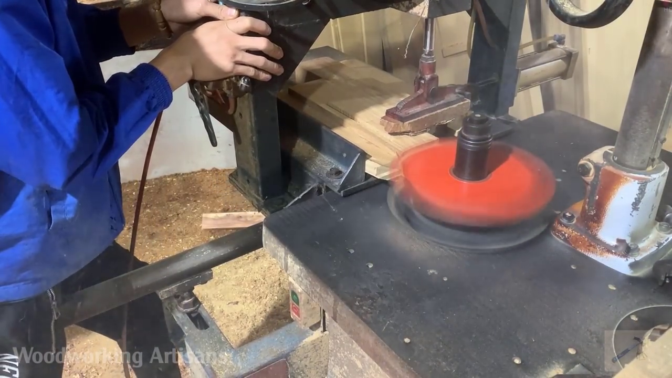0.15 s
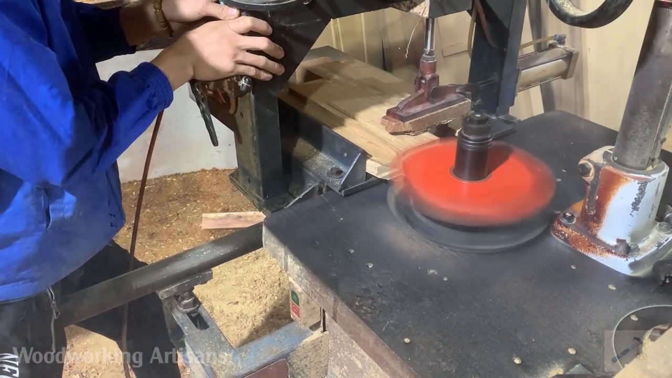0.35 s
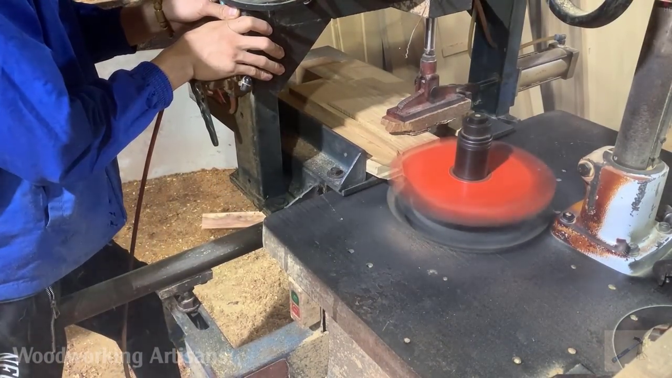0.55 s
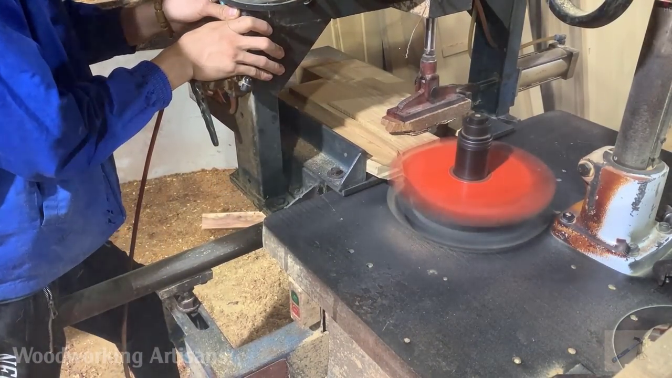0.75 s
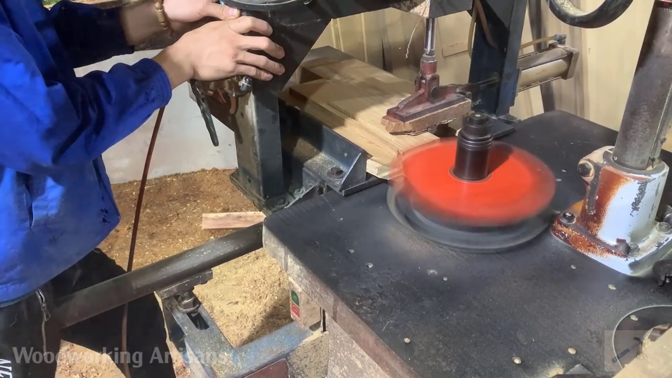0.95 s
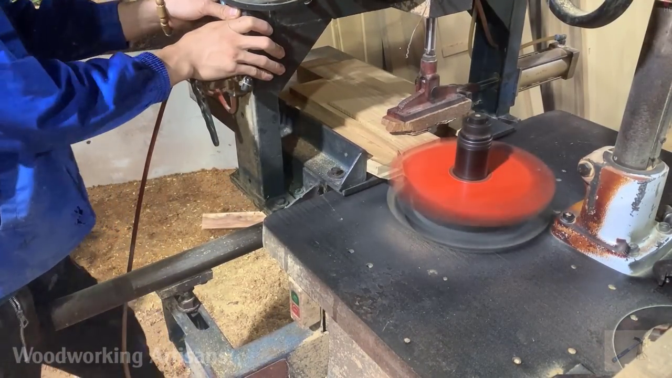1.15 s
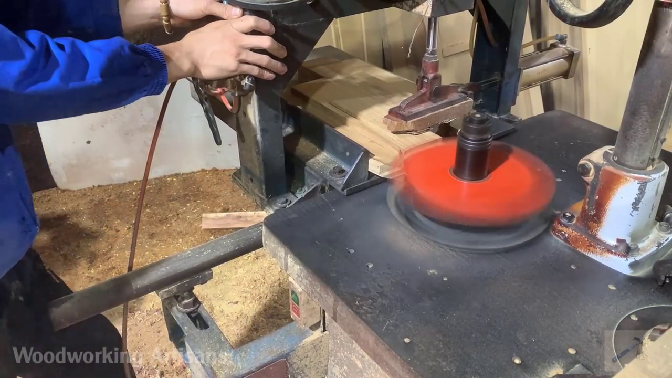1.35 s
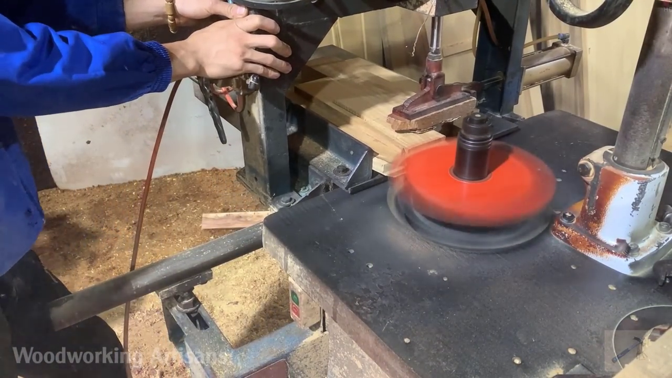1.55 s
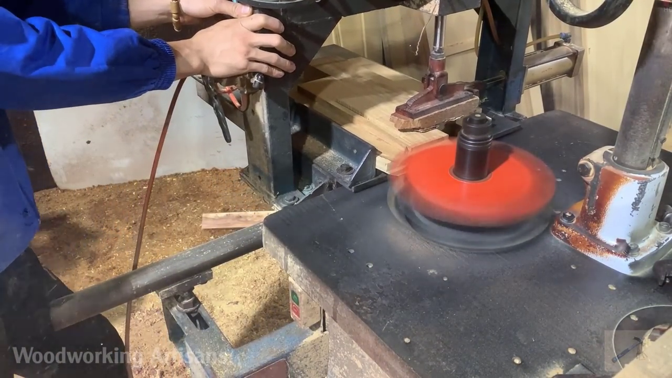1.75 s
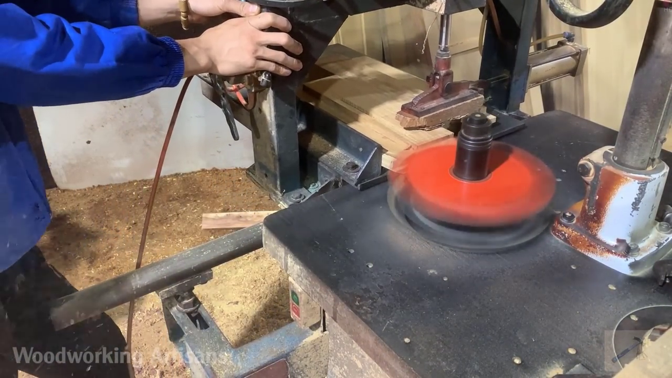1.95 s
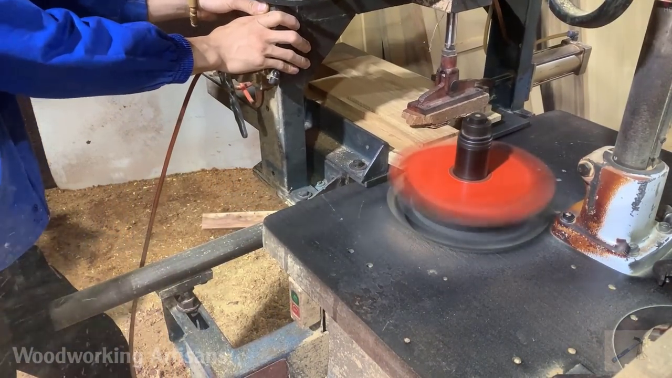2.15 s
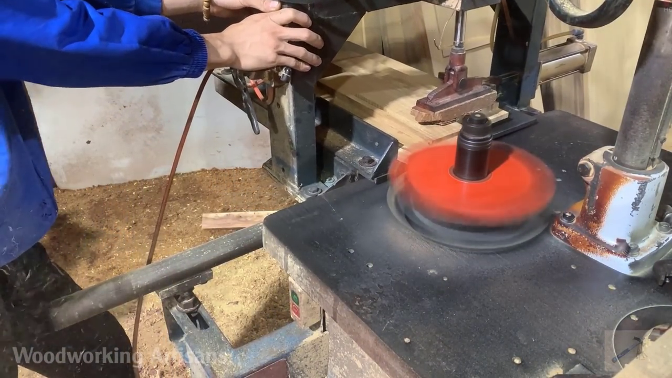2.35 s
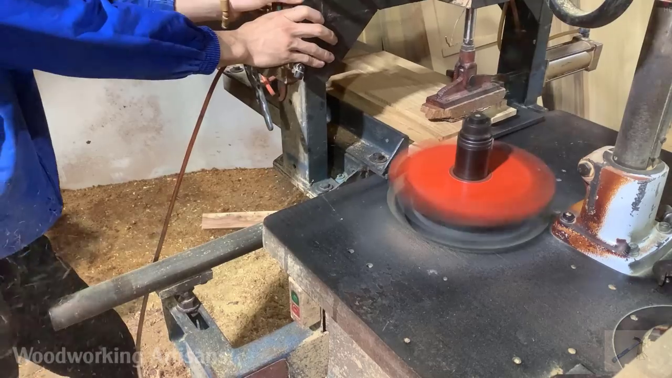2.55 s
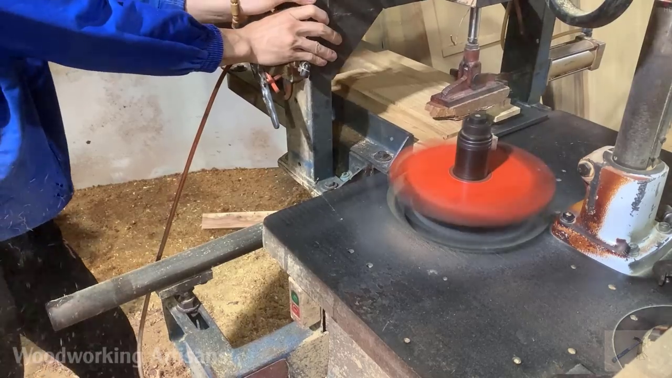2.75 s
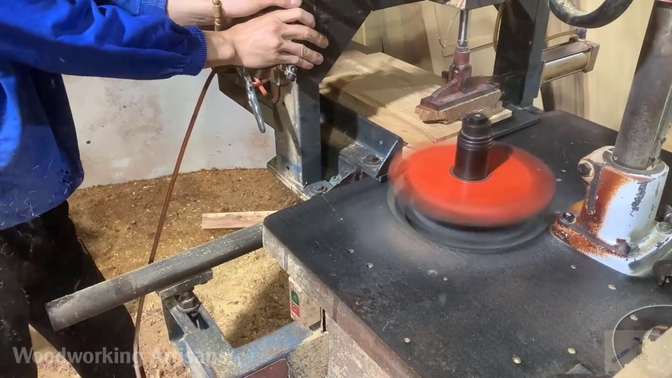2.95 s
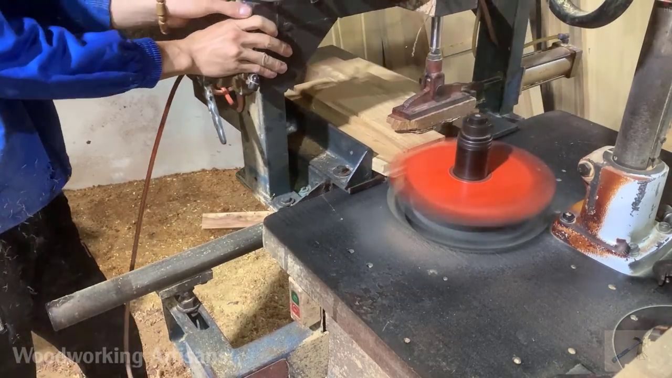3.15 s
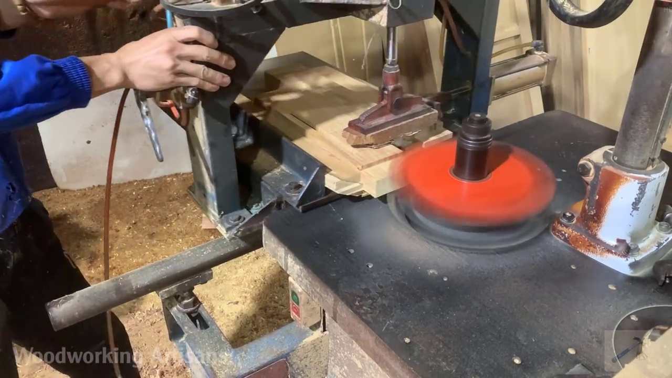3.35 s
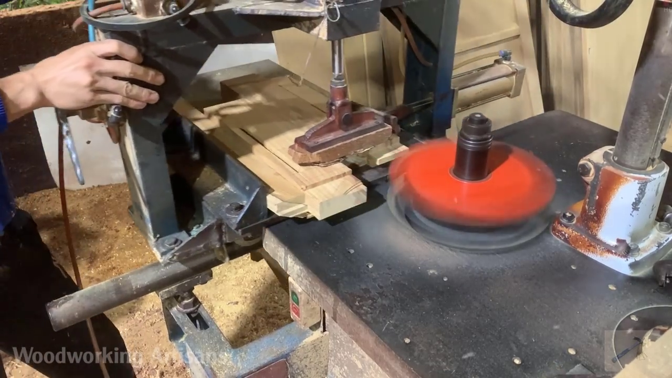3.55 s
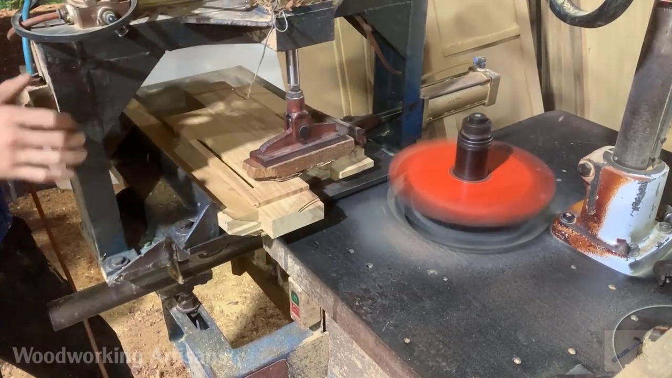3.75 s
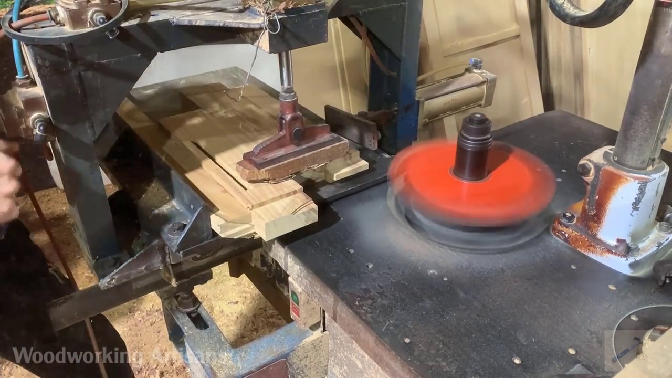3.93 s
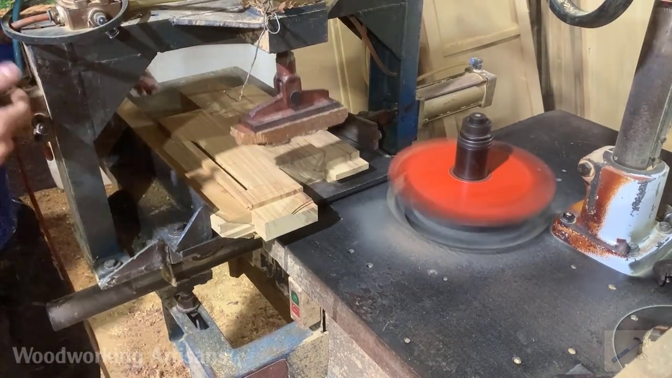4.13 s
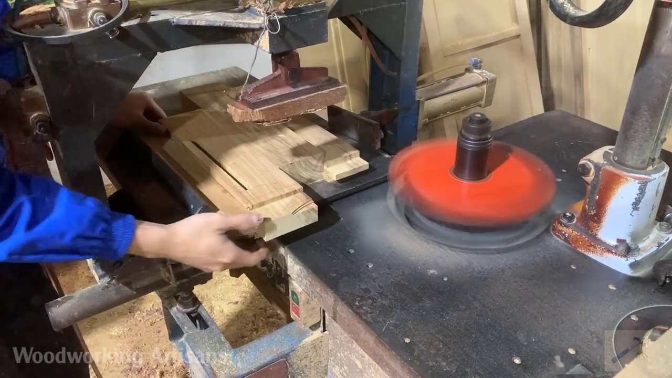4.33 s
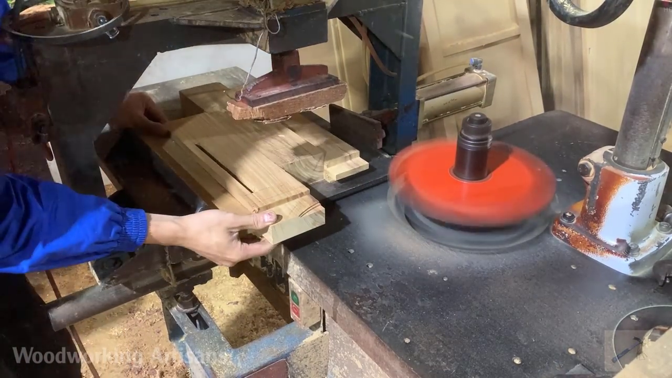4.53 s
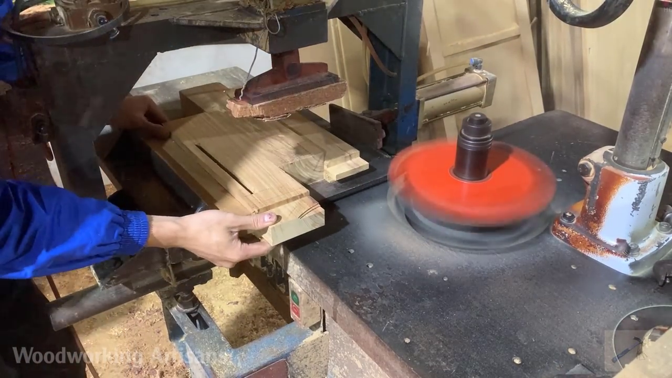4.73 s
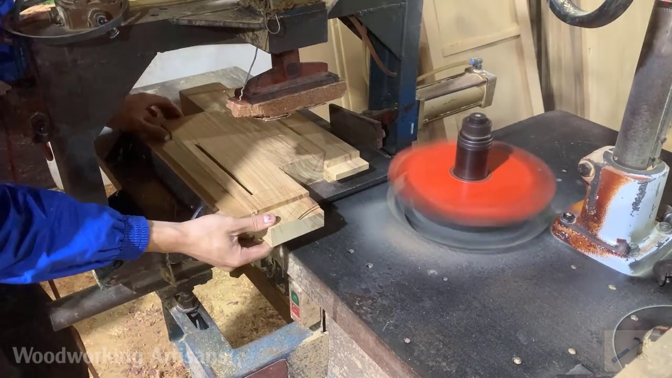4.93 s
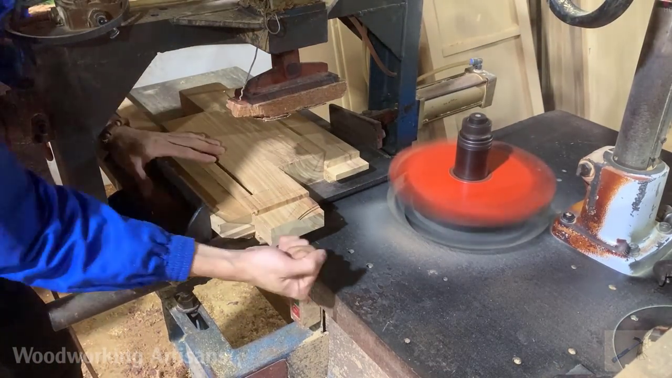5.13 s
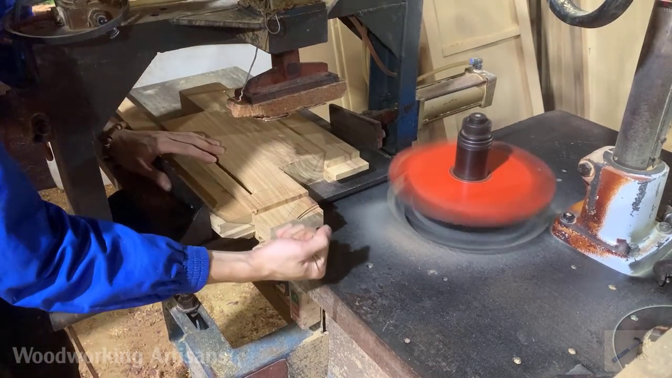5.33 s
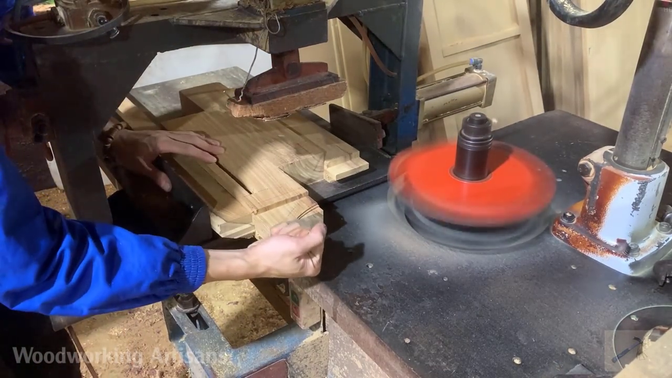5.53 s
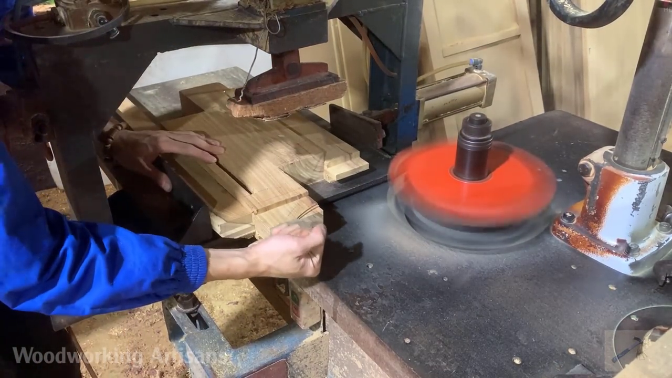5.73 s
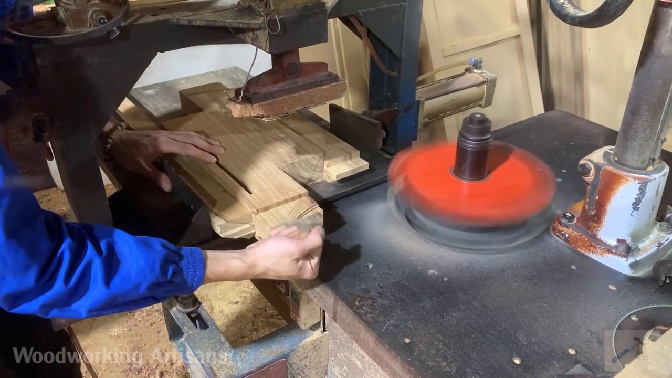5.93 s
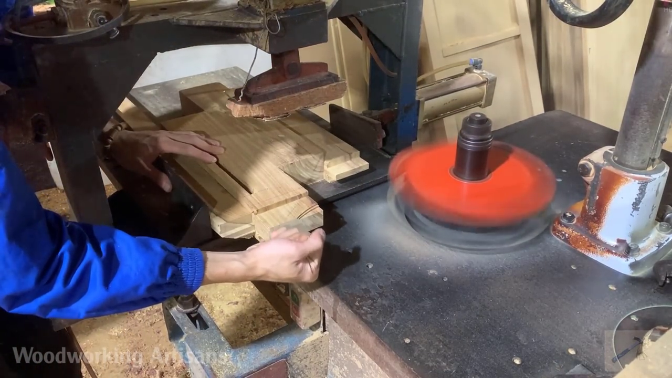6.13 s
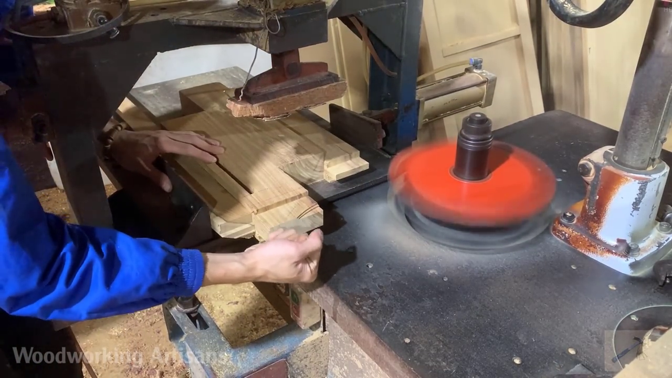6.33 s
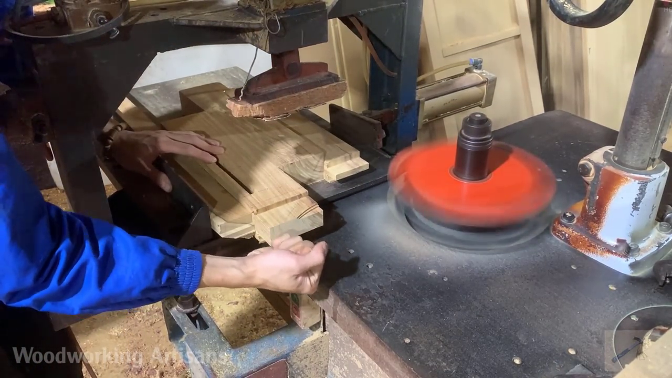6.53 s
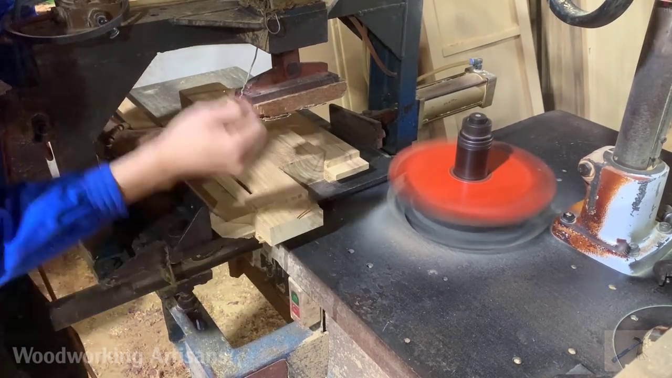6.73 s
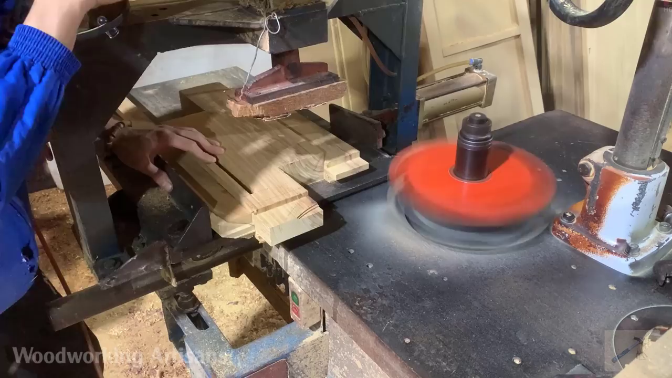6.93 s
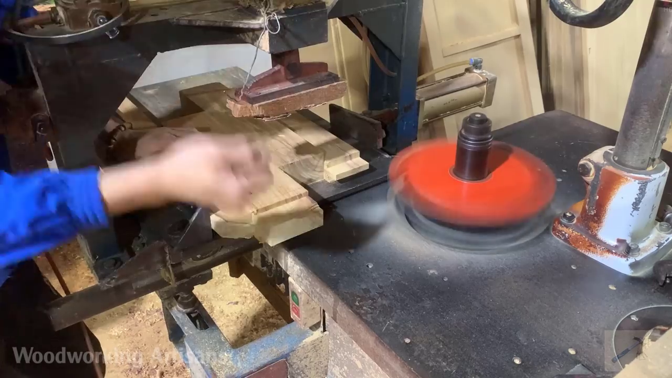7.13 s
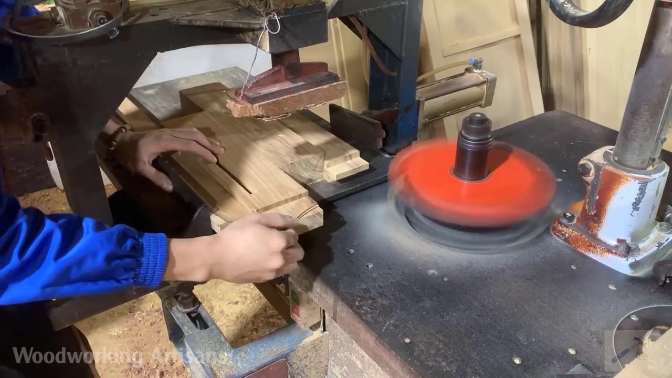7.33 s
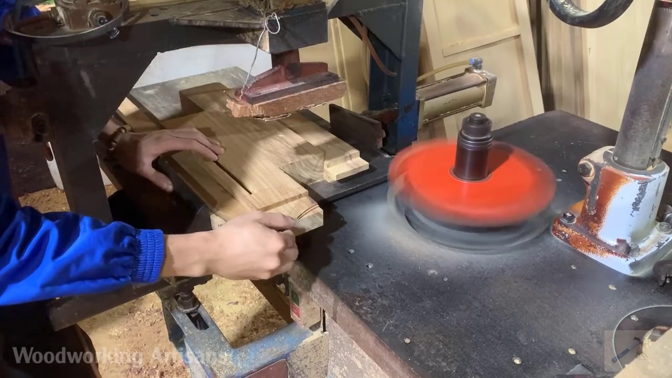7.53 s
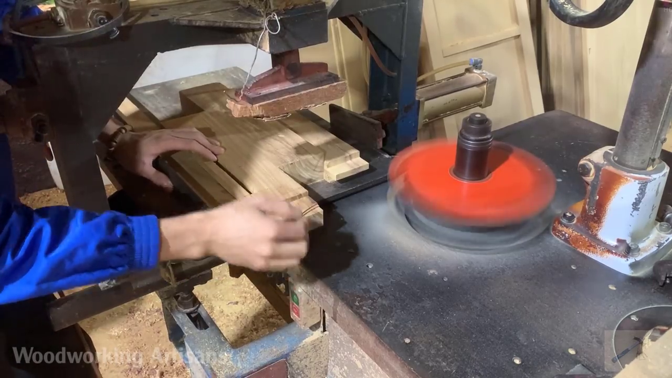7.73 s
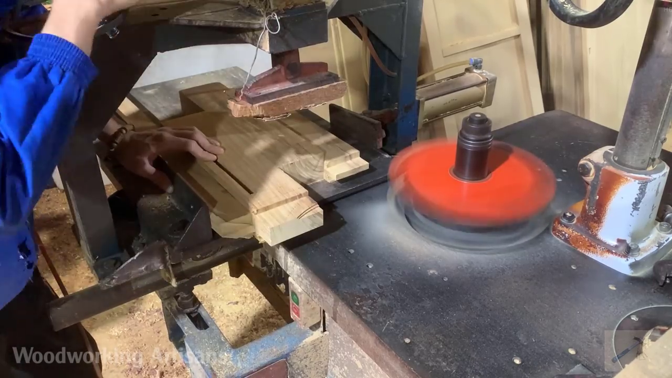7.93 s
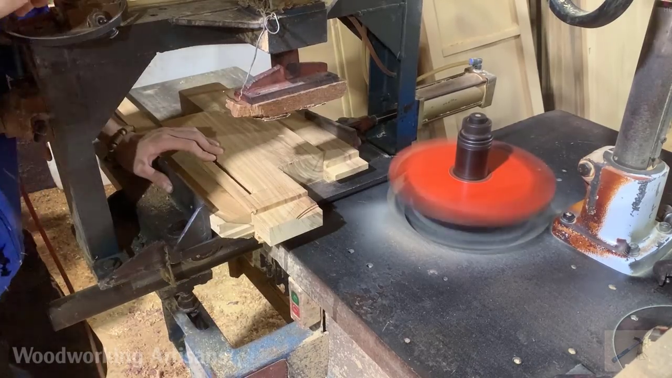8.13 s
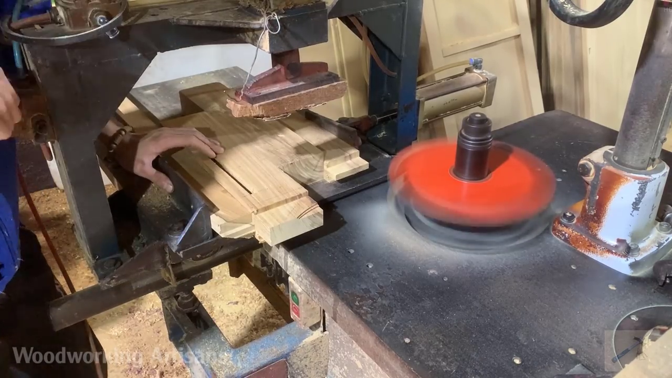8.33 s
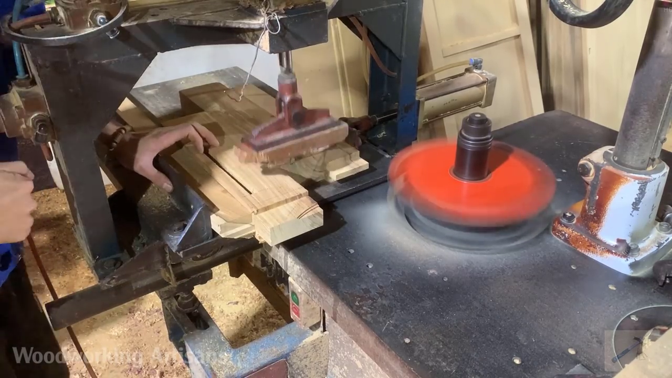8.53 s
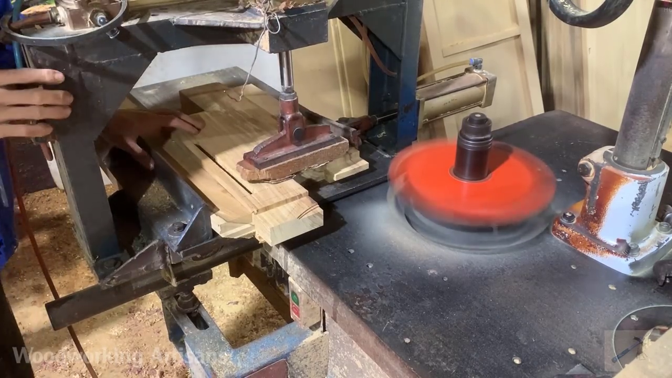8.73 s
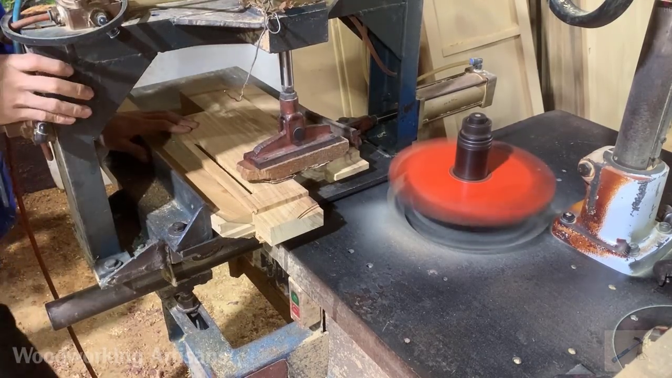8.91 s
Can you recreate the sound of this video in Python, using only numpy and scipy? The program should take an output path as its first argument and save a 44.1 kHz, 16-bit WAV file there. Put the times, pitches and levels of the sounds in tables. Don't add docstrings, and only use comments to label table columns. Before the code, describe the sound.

A woodworking cutter screams through a clamped board in two harsh bites, then workshop hum, air clamp hisses, a loud knock and a sharp vent.

```python
import sys
import numpy as np
from scipy import signal
from scipy.fft import irfft
from scipy.io import wavfile
from scipy.ndimage import uniform_filter1d

SR = 44100
rng = np.random.default_rng(int(sys.argv[2]) if len(sys.argv) > 2 else 0)


def decibels_to_gain(level_db):
    exponent = np.asarray(level_db, float) / 20
    return 10 ** exponent


def pcm_store(signal):
    levels = np.round(np.clip(np.atleast_2d(signal), -1, 1) * 32767)
    wavfile.write(sys.argv[1], SR, levels.astype(np.int16).T)


N = 399987
TIME = np.arange(N) / SR
STEP = 64
SLOW = np.arange(N // STEP + 2) * STEP / SR
CUT_ENDS_S, SHOVE_EDGE_S = 3.68, 0.0086

# multiple of speed, level/dB
# rms, left lead/rad, gain on the second bite/dB, share of the family swell
SHAFT_ORDERS = [ (3, -60, 0, -6, 0), (8, -43, -.1, 0, 1), (16, -48, .2, 0, 1), (22, -57, .5, -3, 0),
                (23, -55, .5, -2, 0), (24, -53, -.1, -3, .3), (26, -57, .3, -3, 0), (30, -51, -.3, 2, 1),
                (31, -60, -.3, 6, .4), (32, -36.5, -1.2, 0, .47), (34, -49, -1, 0, .7),
                (36, -53, -1.2, -4, .5), (37, -53.5, -.4, 7, .7), (38, -31, .1, 0, 1), (39, -57, .1, 5, .9),
                (40, -39.5, -.1, 6, .75), (42, -65, 0, -9, .8), (45, -57, 0, 9, .6), (46, -52, .4, 12, 1),
                (47, -64, .4, 9, .8), (48, -54, .8, 12, .6), (54, -58, 1.4, 9, .7),
                (68, -65, .8, 17, 1.4), (69, -59, -.1, 6, 1.4), (70, -61, .4, 6, 1.4), (74, -49, -.4, 0, 1),
              (78, -50, -.7, -6, 1), (82, -48, .2, 0, 1), (86, -51, -.7, -8, 1), (87, -62, -.7, -7, 1),
              (88, -41.5, -.7, 3, .8), (94, -43, 1, -1, 1), (95, -65, 1, -8, .3), (96, -48.5, 1.2, 0, 1),
              (102, -46, 2.8, 2, .95)]
FAMILY_TOPS = [12, 28, 72, 87]
# f/Hz, left-right level/dB
CUTTER_LEANING = [(900, -2), (1800, 4.5), (2650, -1.5), (4200, 4), (4430, -1.5), (9500, -2), (9750, -11),
                  (11300, -12)]
# start t/s, length/s, lower level/dB, upper level/dB, swell/dB
SQUEAKS = [
    (0.052, 0.42, -48.5, -49.5, 16),
    (0.93, 0.16, -54, -63, 11),
    (1.475, 0.12, -44, -48.5, -2),
]
SQUEAK_MULTIPLES = [93, 109]
# f/Hz, level/dB per Hz
SHAVINGS = [(1500, -36), (3000, 18.5), (5000, -3), (7500, 9), (9500, 10), (12000, -1), (13500, -18),
            (15500, 3)]


def cutter():
    size, families = int(CUT_ENDS_S * SR), swells()
    turn = spindle_angle(size)
    engaged = np.clip((CUT_ENDS_S - TIME[:size]) / 0.22, 0, 1)
    second = np.clip((SLOW - 1.7) / .3, 0, 1) - .65
    flutter = drift(60.0)
    chatter_db = 2.5 * held(2.37, 0.375, 0) * (1 + np.sin(2 * np.pi * 16.8 * SLOW))
    out = np.zeros((2, size))
    for multiple, level_db, lead, second_db, share in SHAFT_ORDERS:
        bite_db = share * families[np.searchsorted(FAMILY_TOPS, multiple)] + second_db * second
        grain_db = (.2 + .01 * multiple) * drift(5.0) + .12 * flutter
        if 45 <= multiple <= 70:
            grain_db = grain_db - 9 * held(2.47 + .005 * (multiple - 46), .7, 0)
        if multiple == 32:
            grain_db = grain_db + chatter_db
        wander = fine(0.0014 * multiple * drift(5.2), size)
        phase = multiple * turn + rng.uniform(0, 2 * np.pi) + wander
        gain = fine(np.sqrt(2) * decibels_to_gain(level_db + bite_db + grain_db), size)
        pair = tone_pair(phase, lead / 2, -lead / 2) * gain
        out += panned(pair, at_hz(CUTTER_LEANING, multiple * SPEED[-1][1]))
    torn_entry_db = 7.2 * held(1.68, 0.216, 0)
    for low, high, bite_db in zip([1] + FAMILY_TOPS, FAMILY_TOPS + [140], families):
        comb = faint_comb(turn + fine(.003 * drift(20.0), size), low, high)
        comb_db = .55 * bite_db - 1 + (high < 80) * torn_entry_db + 2.0 * drift(6.0)
        out += comb * fine(decibels_to_gain(comb_db), size)
    for k, multiple in enumerate(SQUEAK_MULTIPLES):
        rub = sum(decibels_to_gain(row[2 + k]) * held(row[0], row[1], row[4]) for row in SQUEAKS)
        squeak = np.sqrt(2) * np.sin(multiple * turn + fine(.5 * drift(20.0), size))
        out += panned(squeak * fine(rub, size), pan_db=-6.0)
    bursts = 1 + .4 * np.sin(turn) + .4 * np.sin(2 * turn)
    shavings = banded_noise(SHAVINGS, low_hz=1900, patchy_db=1.5, near=.3, size=size) * bursts
    shavings_db = -44.5 + 0.5 * uniform_filter1d(families[-1], size=60)
    out += panned(shavings * fine(decibels_to_gain(shavings_db), size), pan_db=2.0)
    return np.pad(out * engaged, ((0, 0), (0, N - size)))


# t/s, knife-pass level/dB, sharpness of the blow/dB
CONTACT = [(0, -3.5, 4.5), (1.05, 2, 0.5), (1.55, 0, -4.5), (1.9, 4, -7.5), (2.28, -2, -1.5),
           (2.42, -7, -10), (2.56, -6.5, 7.5), (2.95, -5.5, 6.5), (3.1, -6, -3), (3.2, 6, -8),
           (3.36, -4, 16.5), (3.48, -3.5, 4), (3.62, -5, -5)]
# t/s, level/dB
BITE = [(0, -20), (.25, -12), (.4, -15), (.7, -4), (1.07, 9), (1.32, 2.5), (1.51, -15), (1.54, -21),
        (1.68, -21.5), (1.8, -10.5), (1.92, -13.5), (2.1, 5.5), (2.2, 5), (2.6, 0.5), (2.9, -7),
        (3.15, -22), (3.3, -22), (3.38, -25)]
# start t/s, length/s, shaving level/dB, knife-edge level/dB, edge swell/dB
SHOVES = [(0, 0.081, -3.5, -10, -11), (0.09, 0.37, -4, -14, 9), (0.467, 0.58, 4.5, 0.5, 15.5),
          (1.054, 0.13, -3.5, -11, -11), (1.2, 0.089, -5, -10, 0), (1.302, .13, -2, -12, 0),
          (1.458, 0.077, -3, -4, 9), (1.56, .11, -19, -12, 0), (1.675, 0.33, -3.5, -5.5, 4),
          (2.052, 0.14, 2, 3, -9), (2.223, 0.11, 2.5, -8, -8), (2.345, 0.059, 4.5, -5, 5),
          (2.422, .05, 3, -13, 6), (2.495, .04, 2, -14, 0), (2.545, 0.035, 3, -1, 2),
          (2.602, 0.067, 0, -1.5, 6), (2.698, 0.059, -2, -1.5, -2), (2.77, .035, -1.5, -15, 0),
          (2.824, 0.065, 0, -10, -2), (2.852, .13, -24, -2, -4), (2.987, 0.14, -14, -13.5, -2),
          (3.168, .1, -1.5, -8, 4), (3.268, 0.14, -11, -3, 0)]


def swells():
    pass_db, sharp_db = in_time(CONTACT)
    shaving = sum(decibels_to_gain(db) * held(s, length, swell / 4) for s, length, db, _, swell in SHOVES)
    edge = sum(decibels_to_gain(db) * held(s, length, swell) for s, length, _, db, swell in SHOVES)
    families = [pass_db, pass_db + sharp_db, in_time(BITE)[0]]
    r = np.exp(-STEP / SR / 0.02)
    for drive, rest_db in ((shaving, -26), (edge, -23)):
        ringing = np.maximum(drive, signal.lfilter([1 - r], [1, -r], drive))
        ringing = ringing * decibels_to_gain(1.1 * drift(8.6))
        families.append(20 * np.log10(np.hypot(ringing, decibels_to_gain(rest_db))))
    return families


# t/s, speed/turns per s
SPEED = [(0, 110.53), (.42, 110.54), (.7, 110.79), (1.0, 110.81), (1.55, 110.64), (1.92, 110.85),
         (2.3, 110.8), (3.1, 110.9)]


def spindle_angle(size):
    return 2 * np.pi * np.cumsum(fine(in_time(SPEED)[0], size)) / SR


# f/Hz, level/dB rms a line
MISMATCH = [(200, -72), (1500, -66), (2500, -61), (4000, -61), (4700, -61), (5500, -66), (7700, -61),
            (9500, -62), (11000, -62), (13000, -70), (15500, -69)]


def faint_comb(turn, low, high):
    multiples, lines = np.arange(low, high), np.zeros((2, 2049), complex)
    hz = multiples * SPEED[-1][1]
    level_db = at_hz(MISMATCH, hz) + rng.normal(0, 1.0, (2, len(hz)))
    angle = rng.uniform(0, 2 * np.pi, len(hz)) + rng.normal(0, 1.0, (2, len(hz)))
    lines[:, multiples] = decibels_to_gain(level_db) * np.exp(1j * angle) * 2048 * np.sqrt(2)
    angles = np.arange(4096) * 2 * np.pi / 4096
    return np.array([np.interp(turn, angles, loop, period=2 * np.pi) for loop in irfft(lines)])


# start t/s, length/s, multiple of speed, level/dB rms
FLARES = [(0, .065, 74.7, -53), (0, .065, 78.75, -48), (0, .065, 82.7, -45), (0, .065, 86.7, -50),
          (.09, .08, 93, -52), (1.93, .24, 78, -49), (2.03, .15, 86, -47), (.93, .15, 94, -39),
          (.85, .22, 102, -48), (0, .15, 120, -60), (0, .1, 103, -60), (.05, .15, 100.5, -60),
          (.87, .13, 140, -56), (.9, .15, 135, -59), (1.19, .13, 140, -58), (1.48, .17, 136, -59),
          (2.05, .48, 140, -55), (2.1, .3, 136, -57), (2.16, .08, 24, -52), (2.44, .035, 24, -44),
          (2.49, .055, 24, -45), (2.6, .13, 45, -52), (1.68, .32, 42, -55), (1.66, .3, 37, -56),
          (1.7, .2, 40, -54), (1.7, .15, 36, -55), (1.55, .28, 24, -54), (1.68, .15, 33, -58),
          (2.68, .06, 24, -52), (2.81, .05, 24, -52), (2.96, .09, 24, -49), (3.11, .05, 24, -52),
          (3.225, .035, 38, -46), (3.285, .04, 38, -45), (3.27, .05, 32, -48), (3.28, .1, 40, -52),
          (3.33, .07, 64, -56), (3.33, .07, 72, -55), (3.34, .025, 32, -45), (3.35, .06, 24, -49),
          (3.42, .09, 94.45, -53), (3.42, .13, 98.45, -53), (3.43, .07, 106.45, -59), (3.44, .03, 24, -49)]
# start t/s, length/s, level/dB, lowest f/Hz
SPRAY = [
    (0, 1.1, -54, 11500),
    (1.096, .95, -53, 11500),
    (2.052, 0.65, -51.5, 11500),
    (3.17, .12, -55, 10900),
    (3.29, .11, -49, 10000),
]


def flares():
    turn, out = spindle_angle(int(CUT_ENDS_S * SR)), np.zeros((2, N))
    waver, gust = decibels_to_gain(2 * drift(25.0)), decibels_to_gain(1.5 * drift(15.0))
    for s, length, multiple, level_db in FLARES:
        span = around(s, length)
        gain = np.interp(TIME[span], SLOW, np.sqrt(2) * decibels_to_gain(level_db) * held(s, length, 0) * waver)
        out[:, span] += tone_pair(multiple * turn[span], 0.12, -0.077) * gain
    for s, length, level_db, low_hz in SPRAY:
        span = around(s, length)
        bright = signal.butter(3, low_hz, "high", fs=SR, output="sos")
        mid, side = signal.sosfilt(bright, rng.standard_normal((2, span.stop - span.start)))
        gain = np.interp(TIME[span], SLOW, decibels_to_gain(level_db + 8) * held(s, length, 0) * gust)
        out[:, span] += (mid + 0.57 * side * [[1], [-1]]) * gain
    return out


# t/s, level/dB
ROLL = [
    (3.14, -70),
    (3.22, -65),
    (3.4, -49.5),
    (3.6, -52),
    (3.8, -57),
    (3.95, -69),
]
# f/Hz, width/Hz, level/dB
FRAME = [(87.5, 18, -22), (140, 25.0, -21), (170, 12, 3.5), (215, 5.8, 6), (236, 11, -10)]


def carriage():
    shake, out = rng.standard_normal(N), np.zeros(N)
    for hz, width_hz, level_db in FRAME:
        r = np.exp(-np.pi * width_hz / SR)
        pole = [1, -2 * r * np.cos(2 * np.pi * hz / SR), r * r]
        out += decibels_to_gain(level_db) * rms_one(signal.lfilter([1, 0, -1], pole, shake))
    low_band = signal.butter(3, [70, 115], "band", fs=SR, output="sos")
    shudder = rms_one(signal.sosfilt(low_band, shake))
    return rms_one(out) * fine(decibels_to_gain(in_time(ROLL)[0])) + shudder * fine(decibels_to_gain(-61) * held(3.22, 0.41, 0))


# t/s, peak level/dB
KNOCKS = [
    (8.131, -11),
    (8.144, -22),
    (8.623, -20.5),
]
# f/Hz, level/dB, t60/s
BOARD = [(332, -5, 0.096), (910, 5.5, 0.035), (1300, 2, 0.024), (1760, -3, 0.02), (2250, 3, 0.023),
         (2610, 5, 0.022), (3500, -18, 0.015), (4530, -10, 0.018), (6250, -14, 0.011)]


def knocks():
    push, blow = np.zeros((2, N))
    for s, level_db in KNOCKS:
        at, t = round(s * SR), np.arange(400)
        blow[at + 90] = decibels_to_gain(level_db - 6.5)
        push[at:at + 400] = decibels_to_gain(level_db - 22.5) * rng.standard_normal(400) * t / 30 * np.exp(-t / 70.0)
    crack_band = signal.butter(4, [500, 5200], "band", fs=SR, output="sos")
    out = decibels_to_gain(21) * signal.sosfilt(crack_band, push + 1e-18)
    for hz, level_db, t60 in BOARD:
        r, w = decibels_to_gain(-60 / (t60 * SR)), 2 * np.pi * hz / SR
        strike = [0, decibels_to_gain(level_db - 9.0) * np.sin(w)]
        out += signal.lfilter(strike, [1, -2 * r * np.cos(w), r * r], blow + 1e-18)
    return out


# t/s, spit level/dB, spit fall/dB per s, hiss level/dB, hiss length/s
VENTS = [
    (3.785, -34, 600, -55, 0.025),
    (3.829, -28.5, 220, -44, .1),
    (3.993, -34, 1200, -60, .01),
    (4.06, -28, 250, -38, 0.13),
    (8.451, -20.5, 1499, -60, 0.015),
    (8.502, -27, 1500, -60, .012),
    (8.506, -22.5, 1200, -27.5, 0.13),
]
# f/Hz, level/dB per Hz
VENT_COLOUR = [(3500, -40), (4500, -8.5), (6300, -11), (7500, -1.5), (8800, -7), (10500, -10), (12500, -7),
               (14000, 2), (15500, -1.5)]


def clamp_vents():
    envelope = np.zeros(len(SLOW))
    for s, spit_db, fall, hiss_db, length in VENTS:
        t = SLOW - s
        spit = decibels_to_gain(spit_db + np.minimum(1300 * t, -fall * t))
        hiss = decibels_to_gain(hiss_db - 7 * t / length) * (t > 0)
        envelope += np.maximum(spit, hiss) * np.clip((length - t) / 0.025 + .5, 0, 1)
    jet = banded_noise(VENT_COLOUR, low_hz=3330, patchy_db=.7, near=0.32, size=SR)
    low = signal.sosfiltfilt(signal.butter(3, 12500, fs=SR, output="sos"), jet)
    top = envelope * decibels_to_gain(-5 * held(3.76, .2, 0))
    return fine(envelope) * np.tile(low, 10)[:, :N] + fine(top) * np.tile(jet - low, 10)[:, :N]


# start t/s, free f/Hz, length/s, loaded f/Hz, level/dB
STROKES = [(1.49, 5450, .13, 6100, -57), (3.1, 7600, .45, 5250, -59), (4.0, 6900, .1, 6600, -66),
           (4.19, 6550, .12, 6200, -55), (4.54, 8200, .53, 5350, -58), (5.36, 7250, .19, 6500, -54),
           (5.7, 6900, .23, 6050, -56), (6.17, 7100, .16, 5450, -60), (6.57, 7700, .23, 6280, -53),
           (7.0, 8050, .34, 6100, -53), (7.78, 8450, .17, 7900, -59), (8.3, 8600, .3, 7700, -56),
           (8.8, 8100, .27, 7600, -57)]


def far_tool():
    free_db, halfway = -7, .73
    rows = []
    for s, free_hz, length, loaded_hz, db in STROKES:
        sag_hz = halfway * (loaded_hz - free_hz)
        rows += [(s, free_hz, db + free_db / 2),
                 (s + length / 4, free_hz + .6 * sag_hz, db - 1),
                 (s + length / 2, free_hz + sag_hz, db),
                 (s + length, loaded_hz, db - 1),
                 (s + length + .08, loaded_hz + 400, db + free_db)]
    pitch, level_db = in_time(rows)
    pitch = uniform_filter1d(pitch, size=40)
    pan_db = fine(np.clip(-3 * (pitch - 7000) / 1000, -6, 0))
    phase = 2 * np.pi * np.cumsum(fine(pitch + 65 * drift(120.0) + 20 * drift(15.0))) / SR
    lead = .3 - .16 * pan_db
    octave = fine(decibels_to_gain(-5 - .002 * np.maximum(pitch - 5600, 0) - 1 + 1.5 * drift(4.0)))
    tone = np.sin([phase + lead, phase - lead]) + octave * np.sin(2 * phase)
    audible = held(1.49, .15, 0) + (SLOW > STROKES[1][0])
    breath = decibels_to_gain(level_db + 3 + 3 * drift(30.0) + 1.5 * drift(6.0))
    return panned(tone * fine(breath * audible), pan_db)


# t/s, level/dB
WHINE_FADES = [(0, -57), (.35, -49), (1.08, -57), (1.5, -43.5), (2.07, -54), (2.53, -42), (3.58, -58),
               (3.81, -41.5), (4.65, -47.5), (5.15, -43.5), (5.35, -50.5), (5.94, -43.5), (6.54, -52.5),
               (7.05, -40), (7.6, -48), (7.91, -42.5), (8.34, -54.5), (8.77, -49)]
# f/Hz, level/dB re strongest
WHINE = [(2681, -30), (2971, -7.5), (3019, 2), (3067, -11), (3114, -8)]


def motor_whine():
    level_db = in_time(WHINE_FADES)[0] + in_time(GAIN)[0]
    out = np.zeros((2, N))
    for hz, line_db in WHINE:
        phase = 2 * np.pi * hz * TIME + rng.uniform(0, 2 * np.pi) + fine(0.5 * drift(5.4))
        gain = fine(np.sqrt(2) * decibels_to_gain(level_db + line_db - 5.5 + 1.3 * drift(17.0)))
        out += tone_pair(phase, 0.17, -0.62) * gain
    return out


# t/s, level/dB
GAIN = [(0, -4), (3.3, -3.5), (4.4, -4.5), (5.7, -1.5), (7.0, 1.5), (8.05, 5.5), (8.5, 6.5), (9.07, 6.5)]
# f/Hz, share
GAIN_SHARE = [(110, 1), (400, 0.97), (6300, 1), (14000, 1)]
# f/Hz, level/dB
HELD_DOWN = [(60, -16), (110, -5), (400, -2), (6300, -1.5), (14000, -1)]
# f/Hz, level/dB per Hz
SHOP_COLOUR = [(24, -57), (40, -24.5), (140, -10), (198, -7), (254, -12.5), (419, -11), (887, -7.5),
               (1110, -8.5), (2290, -9), (2800, -9), (3020, -8.5), (3420, -11), (6710, -14.5), (15700, -24)]
# f/Hz, level/dB rms, width/Hz, left lead/rad
HUM = [(100, -64, 5, .1), (186, -56, 4, .1), (200, -53, 2, .1), (213, -56, 5, .1), (300, -62, 4, .1),
       (371, -62, 5, .1), (888, -57, 8, .3), (2156, -60, 3, .7), (2204, -62, 3, .7), (2252, -51, 4, .7),
       (2348, -58, 3, .7), (2444, -61, 3, .7), (3740, -63, 9, .7), (6853, -64, 12, .7)]
# t/s, level/dB
FAN_FADES = [(0, -3), (1.3, -25), (3.75, -11), (4.3, -8), (5.4, 1.5), (6.2, -3.5), (6.85, -6), (7.6, -1.5),
             (8.4, 2), (8.6, -3), (8.8, 4), (9.07, -2)]


def shop():
    gain_db, cutting = in_time(GAIN)[0], np.clip((3.05 - SLOW) / 0.22 + 1, 0, 1)

    def moved(hz):
        return at_hz(GAIN_SHARE, hz) * gain_db + at_hz(HELD_DOWN, hz) * cutting

    out = decibels_to_gain(-40.5) * banded_noise(SHOP_COLOUR, low_hz=35.6, patchy_db=1.3, moves=moved)
    for hz, level_db, width_hz, lead in HUM:
        wander = fine(width_hz * 0.3026 * np.cumsum(drift(2.783)) * STEP / SR)
        phase = 2 * np.pi * (hz * TIME + wander) + rng.uniform(0, 2 * np.pi)
        beat_db = in_time(FAN_FADES)[0] + 2 * drift(8.0) if hz == 2252 else 2.8 * drift(2.5)
        gain = fine(np.sqrt(2) * decibels_to_gain(level_db + moved(hz) - 1.5 + beat_db))
        out += tone_pair(phase, lead, -lead) * gain
    return out


# f/Hz, likeness
LIKENESS = [(60, 1), (150, 0.76), (380, 1), (950, 0.82), (2380, 0.52), (5980, 0.056), (15000, 0.04)]
# f/Hz, level/dB
LEANING = [(60, 2), (180, -4.5), (550, 0), (1650, -1), (4970, 0.5), (15000, -4)]


def banded_noise(spectrum, low_hz, patchy_db, moves=None, near=0, size=N):
    edges = low_hz * 2 ** np.arange(0, np.log2(18500 / low_hz), 1 / 3)
    white, together, out, power = rng.standard_normal((2, 2, size)), drift(7.2), 0, 0
    for k, (low, high) in enumerate(zip(edges, edges[1:])):
        band = signal.butter(2, [low, high], "band", fs=SR, output="sos")
        both = signal.sosfilt(band, white[k % 2])
        hz = min(np.sqrt(low * high), 15300)
        alike = np.clip(at_hz(LIKENESS, hz) + near, 0, 1)
        power += decibels_to_gain(2 * at_hz(spectrum, hz)) * (high - low) * 2 / SR
        level_db = at_hz(spectrum, hz) + patchy_db * (0.35 * together + drift(27.0))
        if moves:
            level_db = level_db + moves(hz)
        mid, side = np.sqrt((1 + alike) / 2), np.sqrt((1 - alike) / 2)
        mix = panned(np.array([[mid, side], [mid, -side]]), at_hz(LEANING, hz))
        out = out + fine(decibels_to_gain(level_db), size) * (mix @ both)
    return out / np.sqrt(power)


def tone_pair(phase, left, right):
    return np.sin((phase % (2 * np.pi)).astype(np.float32) + np.float32([[left], [right]]))


def panned(x, pan_db):
    return x * decibels_to_gain(np.reshape(np.multiply.outer([.5, -.5], pan_db), (2, -1)))


def drift(rate):
    r = np.exp(-2 * np.pi * rate * STEP / SR)
    noise = rng.standard_normal(len(SLOW) + 2000)
    return rms_one(signal.lfilter([1], [1, -2 * r, r * r], noise)[2000:])


def held(start, length, swell_db):
    gate = np.clip(np.minimum(SLOW - start, start + length - SLOW) / SHOVE_EDGE_S + .5, 0, 1)
    return gate * decibels_to_gain(swell_db * (np.clip((SLOW - start) / length, 0, 1) - .5))


def around(s, length):
    return slice(max(int((s - SHOVE_EDGE_S) * SR), 0), int((s + length + SHOVE_EDGE_S) * SR))


def in_time(rows):
    s, *columns = np.transpose(rows)
    return [np.interp(SLOW, s, c) for c in columns]


def fine(control, size=N):
    return np.interp(TIME[:size], SLOW, control)


def at_hz(points, hz):
    return np.interp(np.log(hz), np.log(np.array(points)[:, 0]), np.array(points)[:, 1])


def rms_one(x):
    return x / np.sqrt(np.mean(x ** 2) + 1e-20)


# t/s, level/dB
DUCK = [
    (8.5, 6),
    (8.515, -2.5),
    (8.6, -4.5),
    (8.65, -3.5),
    (8.69, 0.5),
    (8.72, 3.5),
    (8.8, 3.5),
]


def scene():
    steady = shop() + motor_whine() + far_tool() + carriage()
    ducked = steady * fine(decibels_to_gain(in_time(DUCK)[0]))
    return cutter() + flares() + ducked + clamp_vents() + knocks()


def band_limit(x):
    return signal.sosfilt(signal.butter(12, 16740, fs=SR, output="sos"), x)


def record(dry):
    mix = signal.sosfilt(signal.butter(2, 75, "high", fs=SR, output="sos"), dry)
    mix = signal.sosfilt(signal.cheby2(20, 60, 16050, fs=SR, output="sos"), mix)
    return band_limit(mix)


dry = scene()
out = record(dry)
pcm_store(out)
```